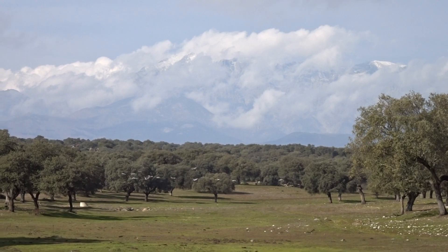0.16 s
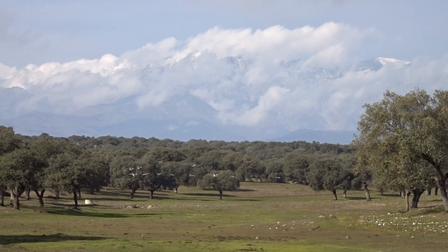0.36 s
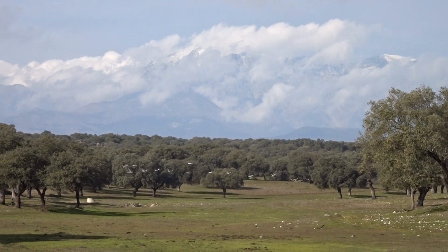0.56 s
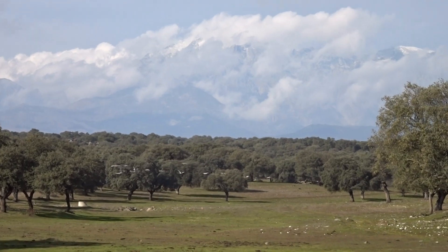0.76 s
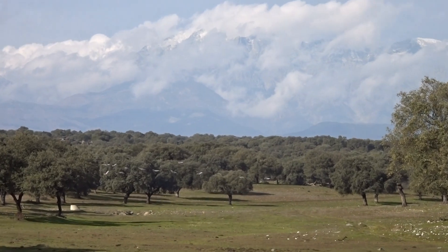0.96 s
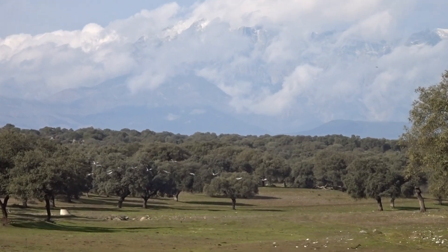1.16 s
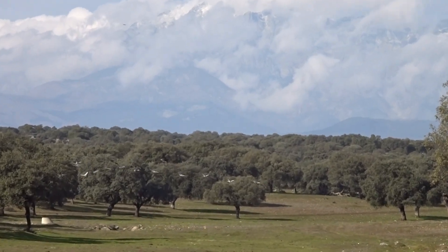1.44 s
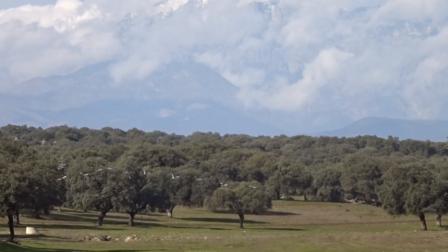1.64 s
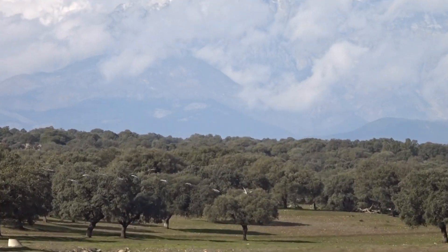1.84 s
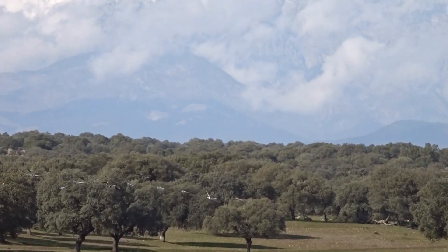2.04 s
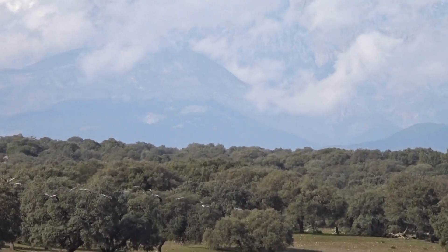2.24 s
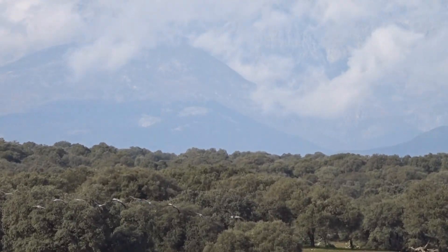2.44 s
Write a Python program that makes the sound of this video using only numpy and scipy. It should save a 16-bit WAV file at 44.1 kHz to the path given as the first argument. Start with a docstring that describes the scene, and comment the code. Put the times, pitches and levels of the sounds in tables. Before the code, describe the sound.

Uneven wind gusts buffet the microphone while distant cranes give rough, rolling calls across open pasture

```python
"""Wind buffets the microphone in uneven gusts: coloured noise and pressure swings over a soft hiss.
A far flock, probably cranes, is a blur of noise; from 0.4 s its rough harmonic calls echo off oaks.
A brief rattle (pulsed noise) near 0.4 s overlaps the first calls. Clicks (decaying noise) engage the
camera's zoom motor, which whirrs and ticks faintly from 0.6 s: cyclic noise in a resonant housing.
From 1.5 s a clean harmonic cry is held; near 2 s a small bird whistles sines while the blur fades."""
import sys
import numpy as np
from scipy import signal
from scipy.fft import rfft, irfft
from scipy.io import wavfile
from scipy.ndimage import uniform_filter1d

SR = 44100
rng = np.random.default_rng(int(sys.argv[2]) if len(sys.argv) > 2 else 0)


def to_wav(s):
    """Save 16-bit WAV."""
    ch = np.atleast_2d(s).T  # columns
    pcm = np.round(np.clip(ch, -1, 1) * 32767)  # PCM
    wavfile.write(sys.argv[1], SR, pcm.astype(np.int16))


N = 114660

# In every spectrum table the density is relative: its noise is scaled to rms 1.

# Crane notes: start_s, length_s, pitch_hz, level_db, second_harmonic_db, flick (share of pitch),
# fall (share of pitch), fade_db (loss over the note), roughness (0-1)
CRANE_NOTES = [(0.392,0.12,732,-57.5,-26,0,0.04,-5.5,0.42), (.44,0.068,756,-59,1.5,0.016,.01,-0.5,0.37),
               (0.489,0.21,895,-58,-21,0,0.0049,9,.45), (0.509,0.026,776,-55,4,.1,0.12,4,0.22),
               (.542,0.037,778,-55,3.5,.14,0.091,1,0.25), (.585,0.029,760,-56,3.5,0.13,0.028,4,0.25),
               (.626,0.03,764,-55.5,3.5,0.15,0.088,3.5,.15), (0.665,0.069,748,-57,2,0.14,0.043,3,.3),
               (.84,0.077,786,-47,-10.5,0.093,0.05,-1.5,0.23), (.918,0.058,760,-41,-10.5,.18,0.091,8,0.43),
               (.961,0.029,769.5,-42,-7,.12,0.092,2,0.25), (.962,0.085,967,-47,-22,.02,0,8.5,0.33),
               (.996,.076,759,-44,-7,.02,0.12,7,0.1), (1.072,0.096,978,-47.5,-21.5,0.087,0.0075,13,0.29),
               (1.158,.092,948,-39,-28,0,0.013,-2,.32), (1.159,0.2,823,-54.5,-6,0,0.05,9,.75),
               (1.262,0.13,942.6,-40,-24,0.12,0.031,5,0.56),
               (1.296,0.12,775.5,-57.5,1.5,0.083,0.06,2.5,.15),
               (1.396,0.029,928,-41.5,-22,0.047,0.015,4,0.59), (1.405,.14,765,-55,-12,.03,.11,5,0.24),
               (1.44,0.058,870,-43.5,-19,0.055,0.063,11.5,0.41)]
ATTACK_S, RELEASE_S, FLICK_S = 0.0059, 0.0058, 0.0095
THIRD_DB, FOURTH_DB = -22, -26  # below the 2nd harmonic
# The roll's depths and the jitter and rasp are shares at full roughness
ROLL_HZ, ROLL_DEPTH, ROLL_BEND, JITTER, RASP = 69.1, 1.05, 0.041, 0.04, 0.6
WINDPIPE_LOW_HZ = 647
# Swell of each harmonic of the clean cry: peak_s, width_s, level_db
CRY_HARMONICS = [(1.82,0.28,-58), (1.826,0.21,-55), (1.67,0.087,-69.5)]
CRY_START_S, CRY_S, CRY_HZ, CRY_FALL = 1.535, 0.238, 1084.4, 0.0296
# Small bird's gliding notes: start_s, length_s, first_pitch_hz, last_pitch_hz, level_db
WHISTLE_NOTES = [(1.991, 0.094, 2330, 2530, -72), (2.21, 0.047, 2730, 2360, -76),
                 (2.266, 0.031, 2630, 2260, -74.5)]
ECHO_DB, ECHO_T60_S, ECHO_SPREAD, BIRD_PAN_DB = -6.5, 0.85, 0.25, 1.5
# Spectrum of the flock blurred by distance: frequency_hz, density_db
FLOCK_SPECTRUM = [(600, -5), (800, -12), (1000, 3.5), (1088, 6.5), (1150, -34), (1300, -17.5),
                  (2200, -16.5), (3000, -32)]
FLOCK_DB, FLOCK_SWELL_DB, FLOCK_FADES_S, FLOCK_FADE_DB_PER_S = -69, 2, 2.05, 48

# Gusts at the microphone, before the rumble and flutter trims: time_s, rumble_db, flutter_db
GUSTS = [(.05, -37.5, -44.5), (.1, -38.5, -36), (.22, -28.5, -34), (.36, -31.5, -37.5), (.53, -30, -33.5),
         (.6, -40, -25), (.66, -26.5, -41.5), (.8, -50, -35), (.88, -34.5, -43.5), (1.03, -32.5, -32.5),
         (1.19, -48, -34.5), (1.33, -30.5, -32), (1.39, -31, -32), (1.43, -39, -65), (1.52, -35.5, -53.5),
         (1.6, -29.5, -34), (1.69, -32, -30.5), (1.855, -34.5, -29.5), (1.895, -40, -37), (1.97, -26, -27),
         (2.17, -39.5, -61), (2.24, -36.5, -59.5), (2.32, -51.5, -71), (2.49, -36.5, -57.5),
         (2.6, -49.5, -59)]
# Spectrum of the low wind rumble: frequency_hz, density_db
RUMBLE_SPECTRUM = [(15, -46), (30, -16), (50, -6.5), (75, -2.5), (115, 2), (150, -7.5), (220, -26.5),
                   (400, -69.5)]
# Spectrum of the quicker wind flutter: frequency_hz, density_db
FLUTTER_SPECTRUM = [(60, -42), (110, -11.5), (145, -1), (200, -2), (280, -8), (400, -18), (600, -39),
                    (1200, -54), (3000, -88)]
RUMBLE_TRIM_DB, FLUTTER_TRIM_DB, RUMBLE_SIDE, FLUTTER_SIDE = -2.5, 0.5, 0.17, 0.24
# The half length is for the strongest flutter; weaker flutter lengthens it
EDDIES_PER_S, EDDY_HALF_S, EDDY_DB, EDDY_SCATTER_DB = 70, 0.0010404, 1.5, 4
# Hardest pressure swings: time_s, level_db, half_length_ms
BUFFET_SWINGS = [(0.403,-18,1.1), (0.445,-14,1.2), (.573,-17,0.98), (.589,-12,1.26), (0.7264,-16,1.21),
                 (0.7657,-22,1.36), (0.7989,-16,1.15), (1.107,-22,1.1), (1.291,-17,1.3), (1.32,-24,2.1),
                 (1.3444,-15.5,0.88), (1.597,-18,1.47), (1.704,-20,0.86), (1.756,-21,1.2),
                 (1.798,-21.5,0.74), (1.838,-17,1.02), (1.869,-17,1.08), (1.922,-18,0.92), (1.934,-19,1.8),
                 (1.9909,-15.5,1.11)]
CROSSING_S, CROSSING_SWAY_S = 0.00063, 0.0004  # the air reaches the right port first
# Spectrum of the steady open-air rumble: frequency_hz, density_db
AIR_SPECTRUM = [(14, -12), (28, -0.5), (90, -9.5), (200, -38), (1000, -89)]
AIR_DB = -54

# Motor ticks within each drive cycle: delay_ms, length_ms, level_db
MOTOR_TICKS = [(3.96, 1.82, -1.5), (22, 0.47, -0.5), (29.6, 0.8, -7.5)]
DRIVE_HZ, WHIRR_DB, TICK_SCATTER_DB = 29.97, -12, 2.5
ZOOM_STARTS_S, ZOOM_RISE_S, ZOOM_DB, ZOOM_GROWTH_DB_PER_S = 0.561, 0.07, -63, 2
# Housing resonances at the left port: frequency_hz, density_db
HOUSING_LEFT = [(3000, -25), (3800, -23), (4500, -10.5), (5300, -8.5), (6600, -5), (7100, -18),
                (7700, -2.5), (8700, -11.5), (9300, -7.5), (10800, -15.5), (11500, -2.5), (12700, -4),
                (13700, -20), (14400, 9), (15400, -7)]
# Housing resonances at the right port: frequency_hz, density_db
HOUSING_RIGHT = [(3000, -24), (3800, -5.5), (5400, -8.5), (7400, -3.5), (7900, -43), (9000, -22), (9700, 7),
                 (10700, -8.5), (11600, 7.5), (12700, -21), (13300, -3), (14000, 10.5), (14600, -18),
                 (15300, -4.5)]
HOUSING_SHARED, PORT_LAG_S, ZOOM_PAN_DB = 0.16, 0.0004, 5  # shared is a share of power
# Spectrum of the whirr while the motor gets going: frequency_hz, density_db
SPIN_UP_SPECTRUM = [(3300, -23), (4000, 4.5), (4500, -32), (5000, 1.5), (5400, 4.5), (5900, -8),
                    (7000, -17)]
SPIN_UP_DB, SPIN_UP_S = -70.5, 0.67
# Clicks as the motor engages, before halving in amplitude: time_s, level_db
ENGAGE_CLICKS = [(0.445, -53), (0.527, -48), (0.586, -43.5)]
# Spectrum of those clicks: frequency_hz, density_db
CLICK_SPECTRUM = [(3000, -31), (6500, -10), (8200, 5), (10000, -21), (13000, -2), (16000, -21)]
CLICK_DECAY_S = 0.0016

# Spectrum of the short dry rattle: frequency_hz, density_db
RATTLE_SPECTRUM = [(1700, 2), (2200, 6), (2600, -5), (3000, -3), (3700, 7), (4300, -15), (7000, -18)]
RATTLE_STARTS_S, RATTLE_S, RATTLE_HZ, RATTLE_DB = 0.366, 0.08, 94.8, -67.5
# Spectrum of air hissing in the grass: frequency_hz, density_db
HISS_SPECTRUM = [(300, 17.5), (1200, 5.5), (3500, -1.5), (8000, -6.5), (13000, -15.5), (16000, -7)]
# Course of that hiss: time_s, level_db
HISS_COURSE = [(.05, -74), (.12, -67.5), (.27, -63.5), (.4, -58.5), (.6, -65.5), (1.6, -65.5), (2.6, -71)]
TOP_HZ = 15750


def crane(t, start, length, hz, db, second_db, flick, fall, fade_db, rough):
    """Modulated harmonic source: a pitch flicks high and sags while a vibration rolls level and pitch."""
    age = np.maximum(t - start, 0)
    u = np.minimum(age / length, 1)
    roll_hz = ROLL_HZ * (1 + 0.2 * walk(27))
    roll = np.sin(2 * np.pi * np.cumsum((age > 0) * roll_hz) / SR)
    unsteady = rough * (ROLL_BEND * roll + JITTER * walk(185.7))
    phase = phase_of(hz * (1 + flick * np.exp(-age / FLICK_S) - fall * u ** 3 + unsteady))
    rasp = 1 + RASP * rough * (walk(525) + 1j * walk(580))  # random level and phase
    levels_db = [0, second_db, second_db + THIRD_DB, second_db + FOURTH_DB]
    harmonics = sum(undb(h) * np.exp(1j * (k + 1) * phase) for k, h in enumerate(levels_db))
    voice = np.sqrt(2) * np.imag(rasp * harmonics)
    rolling = (1 + ROLL_DEPTH * rough * roll) / (1 + rough ** 2 / 2)
    return voice * rolling * gate(age, length) * undb(db - fade_db * u)


def cry(t):
    """Additive synthesis: the harmonics of a held, late-sagging pitch swell each in turn."""
    age = t - CRY_START_S
    phase = phase_of(CRY_HZ * (1 - CRY_FALL * np.clip(age / CRY_S, 0, 1) ** 4))
    voice = 0
    for k, (peak_s, width_s, db) in enumerate(CRY_HARMONICS):
        swell = undb(db + 0.84 * walk(49)) / (1 + ((t - peak_s) / width_s) ** 2)
        voice = voice + swell * np.sin((k + 1) * phase)
    return np.sqrt(2) * voice * gate(age, CRY_S)


def whistle(t, start, length, first_hz, last_hz, db):
    """Frequency glide: a single sine slides between two pitches with slight jitter."""
    pitch = np.interp(t, [start, start + length], [first_hz, last_hz]) * (1 + 0.0076 * walk(134.0))
    return np.sqrt(2) * undb(db) * gate(t - start, length) * np.sin(phase_of(pitch))


def trees_echo(t, direct):
    """Diffuse reflection: dulled calls convolve with exponentially decaying stereo noise."""
    tail = np.exp(-np.log(1000) * t / ECHO_T60_S) * np.minimum(t / 0.013, 1)
    side = ECHO_SPREAD * rng.standard_normal(N) * np.array([[1], [-1]])
    trees = (rng.standard_normal(N) + side) * tail / np.sqrt(np.sum(tail ** 2))
    dulled = signal.sosfilt(signal.butter(1, 1400, fs=SR, output="sos"), direct)
    return signal.fftconvolve(dulled[None], trees, axes=1)[:, :N]


def far_flock(t):
    """Incoherent summation: many distant voices blur into swelling coloured noise."""
    fade_db = FLOCK_FADE_DB_PER_S * np.maximum(t - FLOCK_FADES_S, 0)
    return wide(FLOCK_SPECTRUM, 0.24) * undb(FLOCK_DB + FLOCK_SWELL_DB * walk(5.4) - fade_db)


def birds(t):
    """Superposition: direct calls, their echo and the far flock add."""
    windpipe = signal.butter(6, WINDPIPE_LOW_HZ, "highpass", fs=SR, output="sos")
    cranes = signal.sosfilt(windpipe, sum(crane(t, *row) for row in CRANE_NOTES))
    direct = cranes + sum(whistle(t, *row) for row in WHISTLE_NOTES) + cry(t)
    return (direct + undb(ECHO_DB) * trees_echo(t, direct)) * pan(BIRD_PAN_DB) + far_flock(t)


def eddy(age, half_s):
    """Vortex pressure: one swing up and down as an eddy crosses a port."""
    u = age / half_s
    return -2 * u / np.cosh(np.clip(u, -20, 20)) ** 2 * (np.abs(u) < 10) / 0.77


def add_eddies(t, out, flutter):
    """Random arrivals: scattered eddies strengthen and shorten with the flutter."""
    count = int(EDDIES_PER_S * N / SR)
    for k, (when, size, length, side) in enumerate(rng.standard_normal((count, 4))):
        i = int(np.clip((k + when) / EDDIES_PER_S * SR, 0, N - 1))
        near = slice(max(i - 800, 0), i + 800)
        force = flutter[i] / flutter.max()
        half_s = EDDY_HALF_S * np.exp(0.088 * length) / force ** 0.29
        level = flutter[i] * undb(EDDY_DB + EDDY_SCATTER_DB * np.tanh(size))
        out[:, near] += eddy(t[near] - t[i], half_s) * level * pan(3 * side)


def wind(t):
    """Turbulent pressure: rumble, flutter and eddies follow the gusts, and buffets thump."""
    flutter = undb(curve(GUSTS, col=2))
    out = wide(RUMBLE_SPECTRUM, RUMBLE_SIDE) * undb(curve(GUSTS, col=1) + RUMBLE_TRIM_DB)
    out += wide(FLUTTER_SPECTRUM, FLUTTER_SIDE) * flutter * undb(FLUTTER_TRIM_DB)
    add_eddies(t, out, flutter)
    for s, db, half_ms in BUFFET_SWINGS:
        out += eddy(t - s, half_ms / 1000) * undb(db)
    lag = CROSSING_S + CROSSING_SWAY_S * walk(4.8)
    left, right = np.interp(t - lag / 2, t, out[0]), np.interp(t + lag / 2, t, out[1])
    return np.array([left, right]) + wide(AIR_SPECTRUM, 0.17) * undb(AIR_DB)


def motor_drive():
    """Periodic excitation: tick powers repeat each drive cycle above a steady whirr."""
    t_ms, cycle_ms = 1000 * np.arange(N) / SR, 1000 / DRIVE_HZ
    power = undb(WHIRR_DB) ** 2
    for delay_ms, length_ms, db in MOTOR_TICKS:
        apart_ms = (t_ms - delay_ms + cycle_ms / 2) % cycle_ms - cycle_ms / 2
        power = power + undb(db) ** 2 * np.exp(-0.5 * (apart_ms / length_ms) ** 2)
    return unit(np.sqrt(power) * undb(TICK_SCATTER_DB * walk(146)))


def housing_grit():
    """Resonant filtering: partly shared noise takes the housing's colour at each port."""
    grit = rng.standard_normal(N)
    left, right = [
        tint(np.sqrt(HOUSING_SHARED) * grit + np.sqrt(1 - HOUSING_SHARED) * rng.standard_normal(N), colour)
        for colour in (HOUSING_LEFT, HOUSING_RIGHT)]
    return np.array([left, np.roll(right, int(PORT_LAG_S * SR))])


def engage_clicks(t):
    """Impact decay: noise starts abruptly and dies exponentially at each click."""
    decay = sum(undb(db) * (t >= s) * np.exp(-np.abs(t - s) / CLICK_DECAY_S) for s, db in ENGAGE_CLICKS)
    return 0.5 * decay * wide(CLICK_SPECTRUM, 1.0)


def zoom(t):
    """Structure-borne sound: the motor clicks in, whirrs and ticks through its housing."""
    age = t - ZOOM_STARTS_S
    rise = np.clip(age / ZOOM_RISE_S, 0, 1)
    running = rise * undb(ZOOM_DB + ZOOM_GROWTH_DB_PER_S * age)
    ticking = housing_grit() * motor_drive() * running * pan(ZOOM_PAN_DB)
    whirr_fade = np.clip((SPIN_UP_S - age) / 0.16, 0, 1)
    spin_up = wide(SPIN_UP_SPECTRUM, 1.0) * undb(SPIN_UP_DB) * rise * whirr_fade
    return ticking + spin_up + engage_clicks(t)


def rattle(t):
    """Amplitude modulation: a fast run of sharp-edged, decaying pulses shapes noise."""
    age = t - RATTLE_STARTS_S
    pulses = unit(np.exp(-(age * RATTLE_HZ % 1) / 0.8))
    return wide(RATTLE_SPECTRUM, 0.76) * pulses * gate(age, RATTLE_S) * undb(RATTLE_DB)


def grass_hiss():
    """Broadband flow noise: air in the grass hisses at a changing level."""
    return wide(HISS_SPECTRUM, 1.0) * undb(curve(HISS_COURSE, col=1))


def undb(db):
    """Logarithmic level: decibels become an amplitude gain."""
    return 10 ** (np.asarray(db) / 20)


def unit(x):
    """Normalization: scale to rms 1."""
    return x / np.sqrt(np.mean(x ** 2))


def pan(db):
    """Level difference between ports: left and right gains."""
    return undb(np.array([[db], [-db]]) / 2)


def curve(table, col):
    """Linear interpolation: a table column joined by straight lines in time."""
    rows = np.array(table)
    return np.interp(np.arange(N) / SR, rows[:, 0], rows[:, col])


def phase_of(pitch_hz):
    """Phase is the time integral of frequency."""
    return 2 * np.pi * np.cumsum(pitch_hz) / SR


def tint(x, colour):
    """Spectral shaping: (Hz, dB) points set the gain, falling away below the first; rms 1."""
    hz, db = np.array(colour, float).T
    f = np.maximum(np.arange(N // 2 + 1) * SR / N, 1)
    gain = undb(np.interp(np.log(f), np.log(hz), db)) * np.minimum(f / hz[0], 1) ** 2
    return unit(irfft(rfft(x) * gain, N))


def noise(colour):
    """Filtered white noise: random samples take a spectrum."""
    return tint(rng.standard_normal(N), colour)


def wide(colour, side):
    """Partial coherence: common noise plus a share of opposite sign at the two ports."""
    return noise(colour) + side * noise(colour) * np.array([[1], [-1]])


def walk(rate_hz):
    """Low-pass randomness: two running means leave smooth chance of rms 1."""
    k = max(int(SR / rate_hz), 2)
    once = uniform_filter1d(rng.standard_normal(N), k, mode="wrap")
    return unit(uniform_filter1d(once, k, mode="wrap"))


def gate(age, length):
    """Amplitude envelope: linear attack, hold and release."""
    return np.clip(age / ATTACK_S, 0, 1) * np.clip((length - age) / RELEASE_S, 0, 1)


def scene():
    """Superposition: far birds add to wind, motor, rattle and hiss."""
    t = np.arange(N) / SR
    return birds(t) + wind(t) + zoom(t) + rattle(t) + grass_hiss()


def record(dry):
    """Band limiting: the sound fades in quickly, fades out briefly, and loses its top."""
    t = np.arange(N) / SR
    fade = np.clip((t - 0.04) / 0.045, 0, 1) * np.clip((t[-1] - t) / 0.006, 0, 1)
    return signal.sosfilt(signal.ellip(10, 0.2, 80, TOP_HZ, fs=SR, output="sos"), dry * fade)


dry = scene()
out = record(dry)
to_wav(out)
```